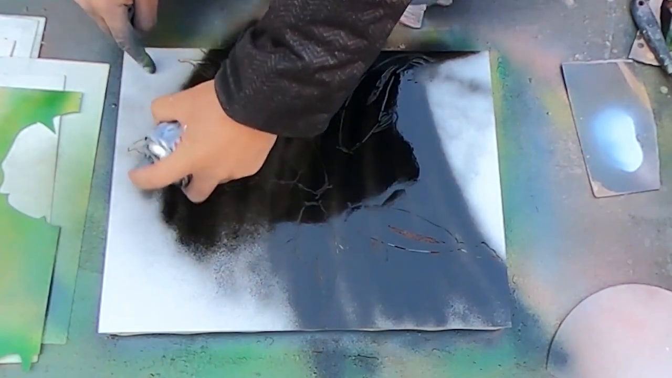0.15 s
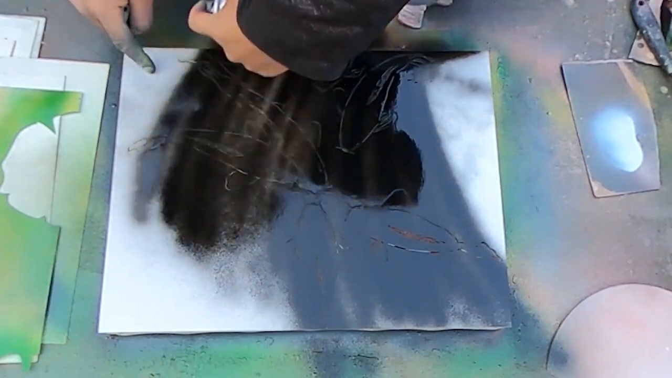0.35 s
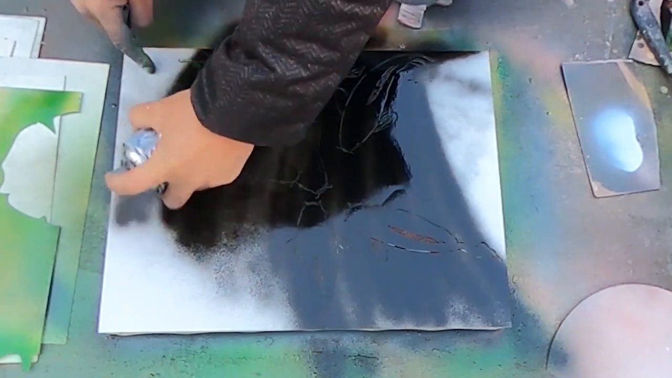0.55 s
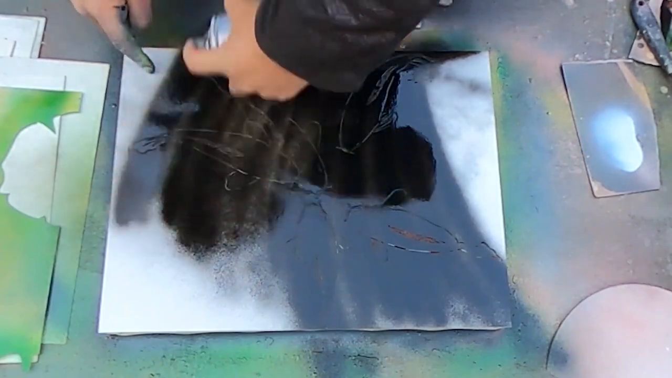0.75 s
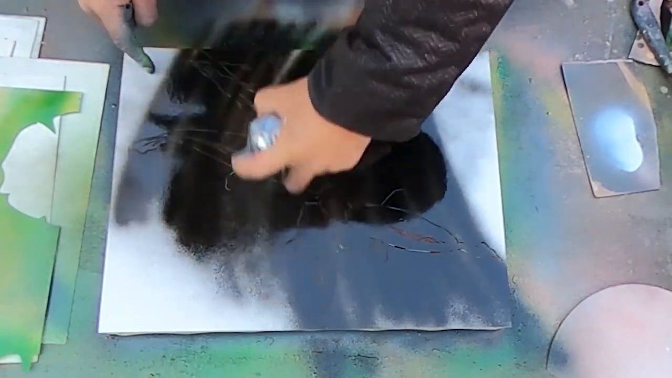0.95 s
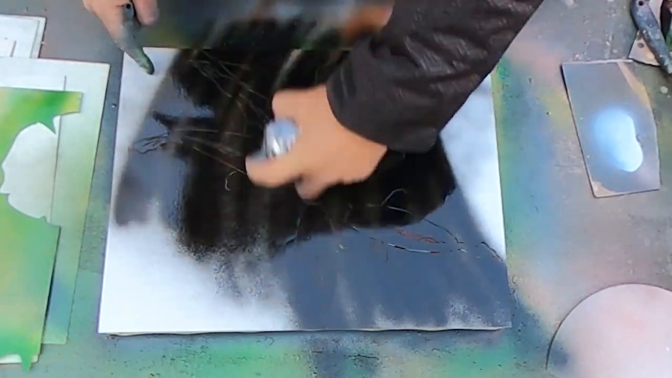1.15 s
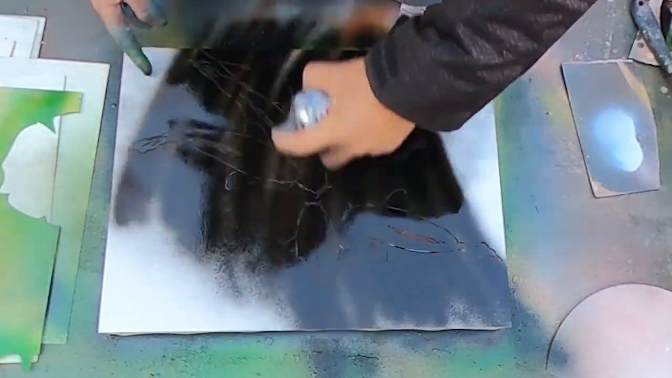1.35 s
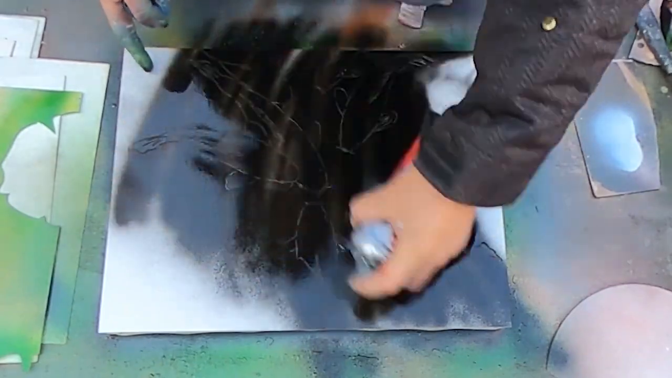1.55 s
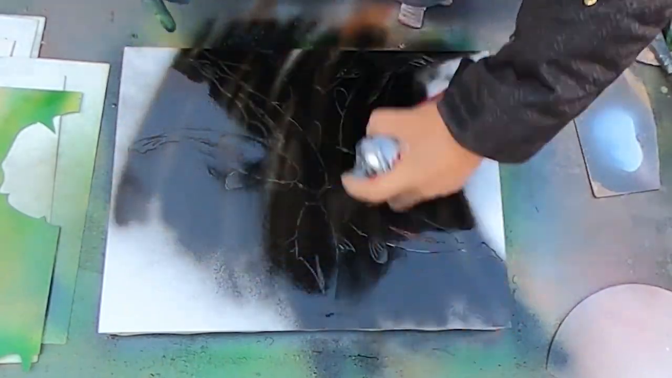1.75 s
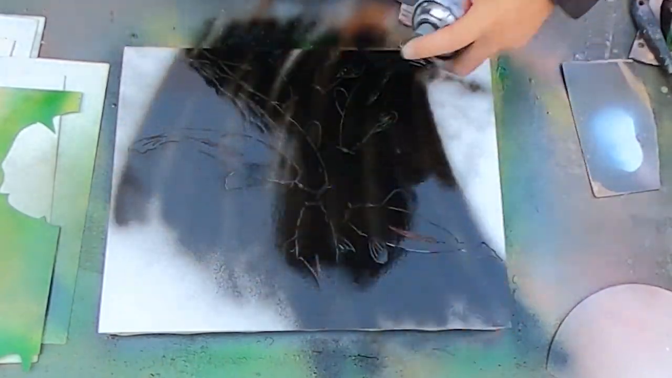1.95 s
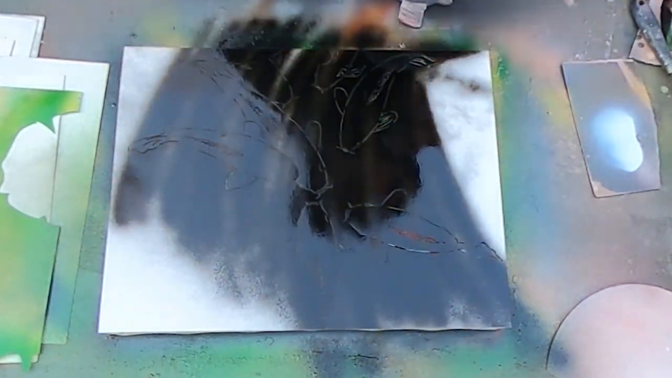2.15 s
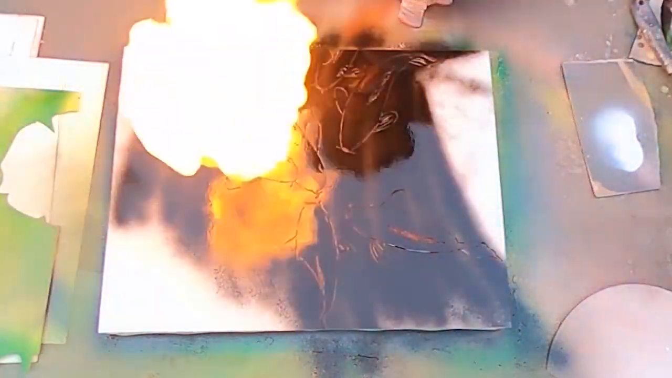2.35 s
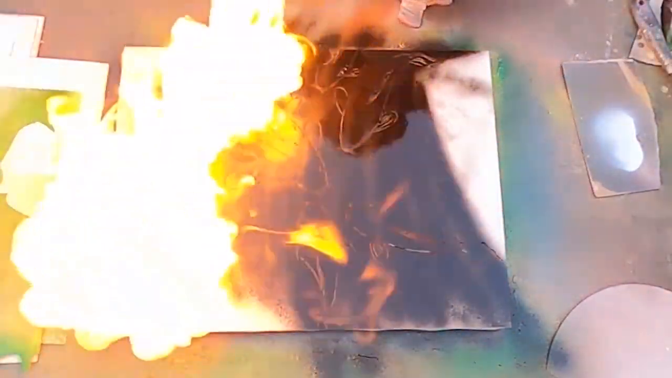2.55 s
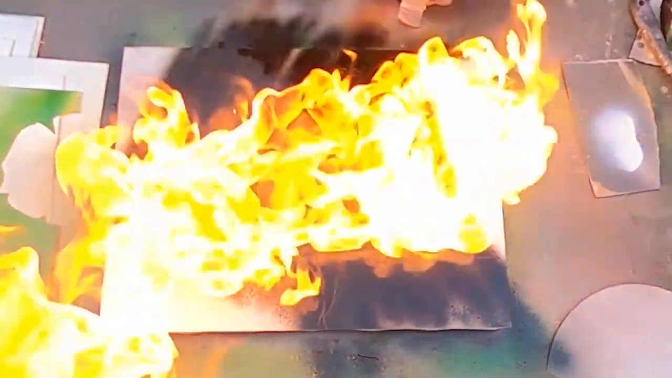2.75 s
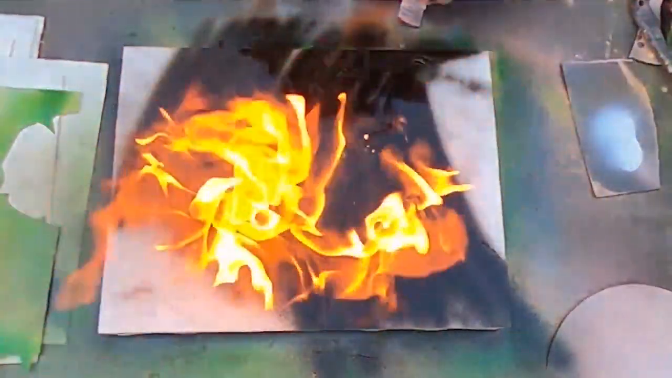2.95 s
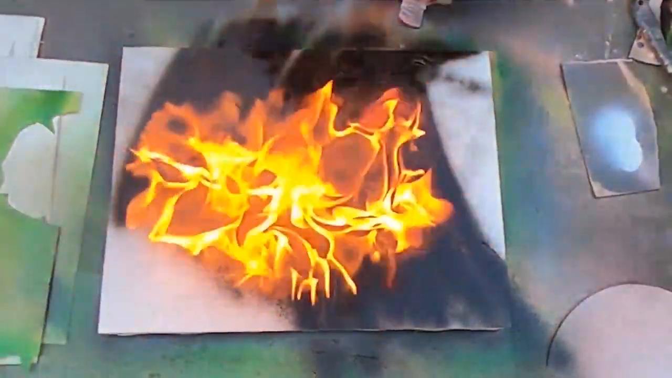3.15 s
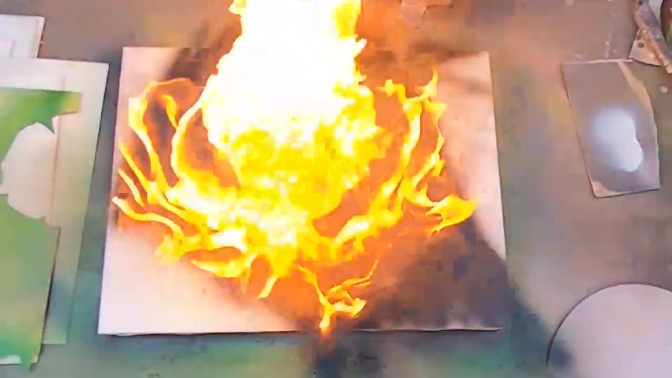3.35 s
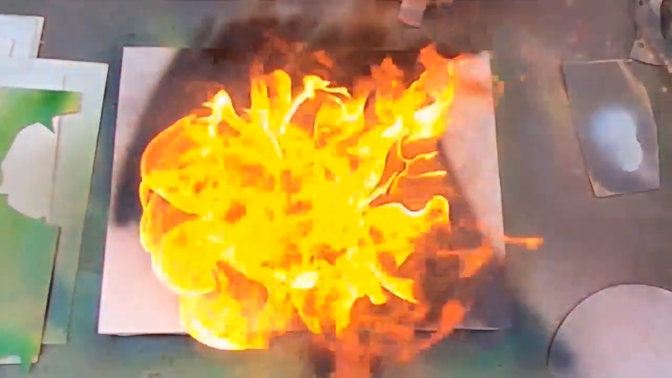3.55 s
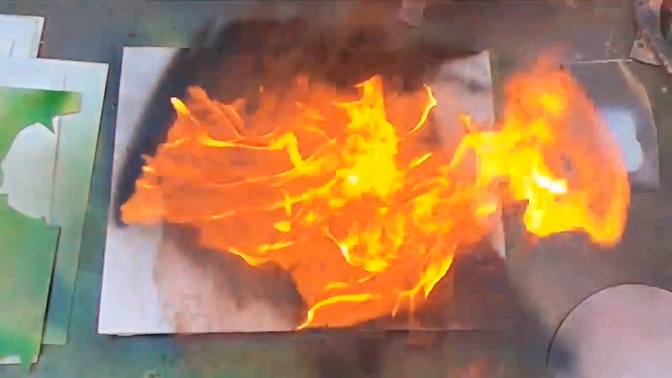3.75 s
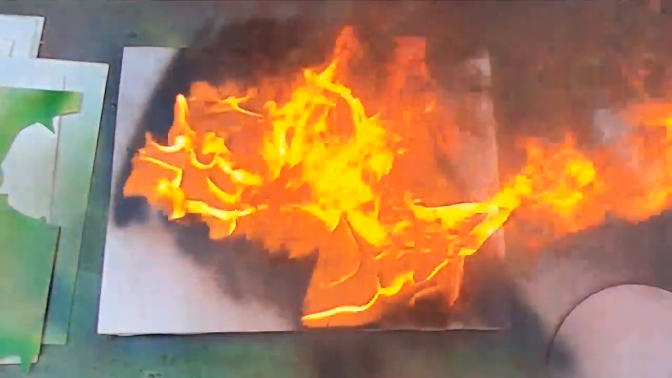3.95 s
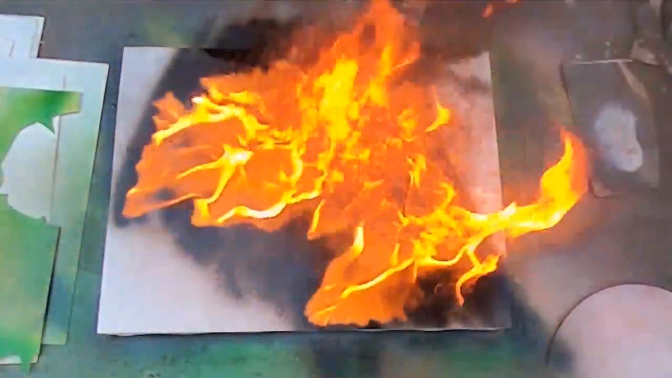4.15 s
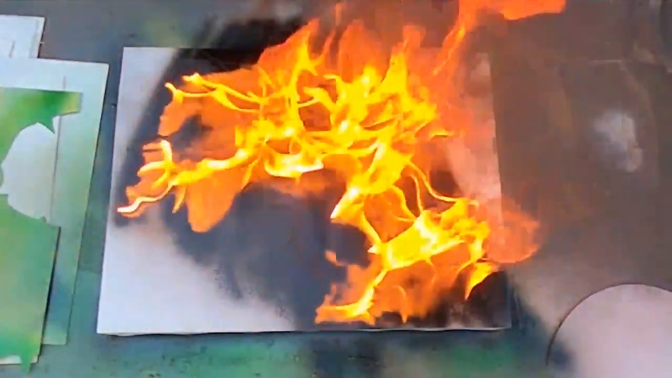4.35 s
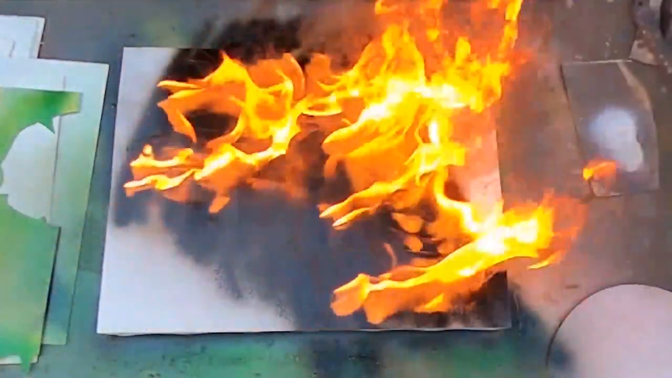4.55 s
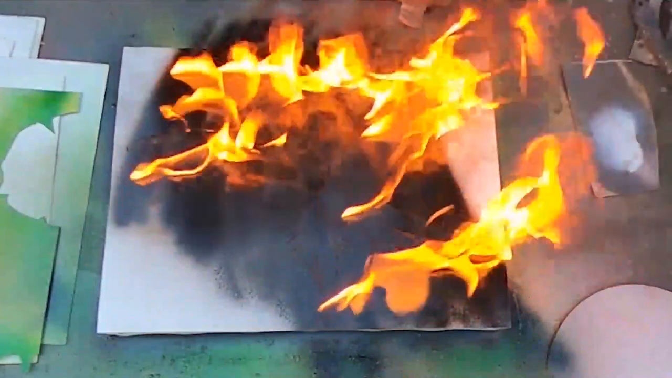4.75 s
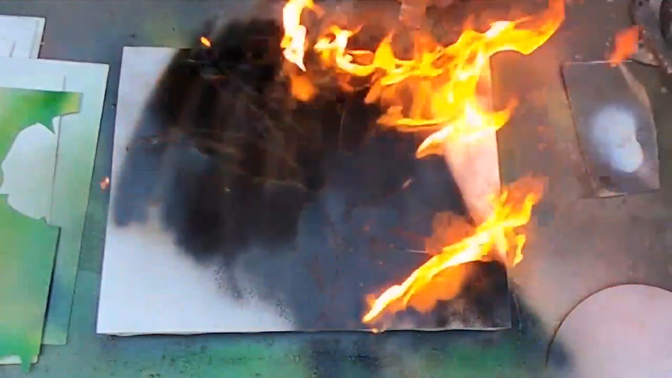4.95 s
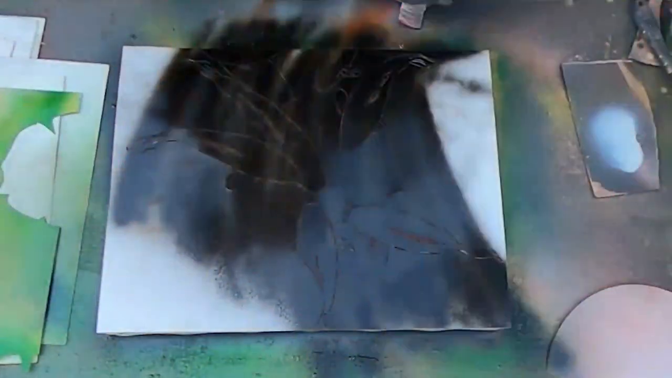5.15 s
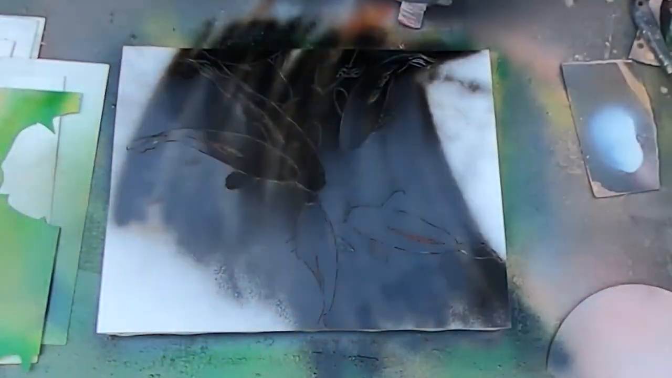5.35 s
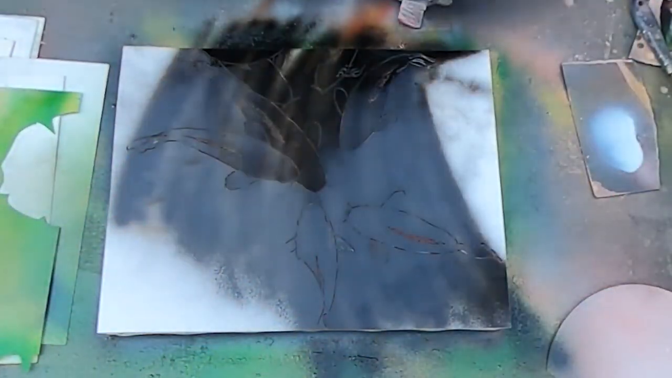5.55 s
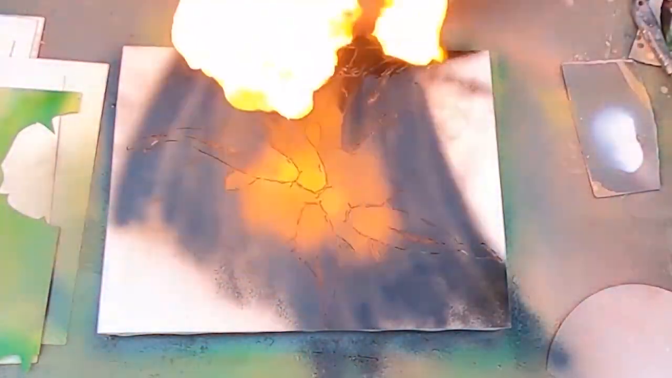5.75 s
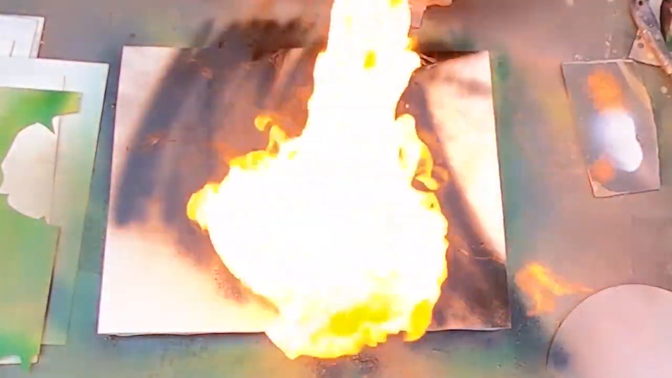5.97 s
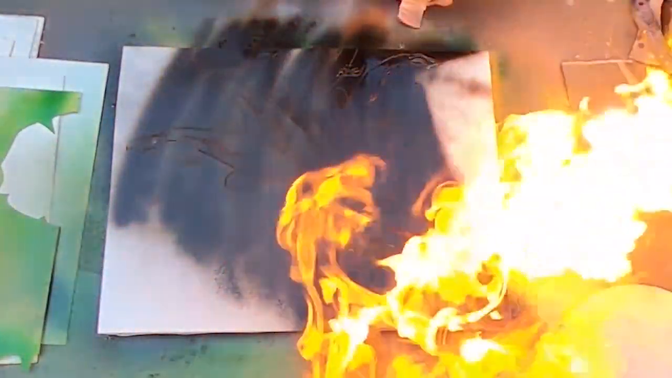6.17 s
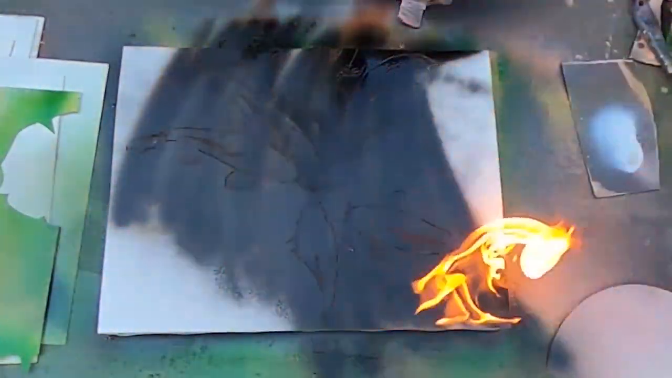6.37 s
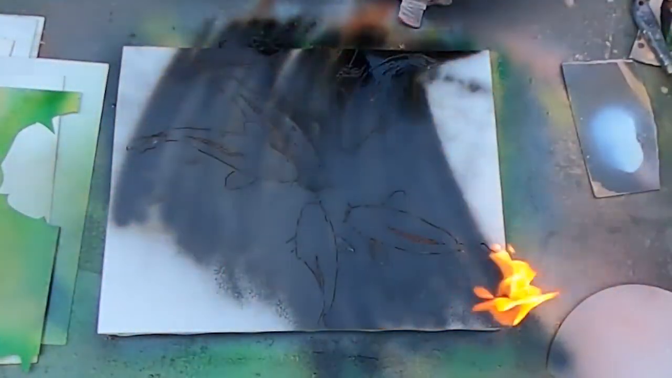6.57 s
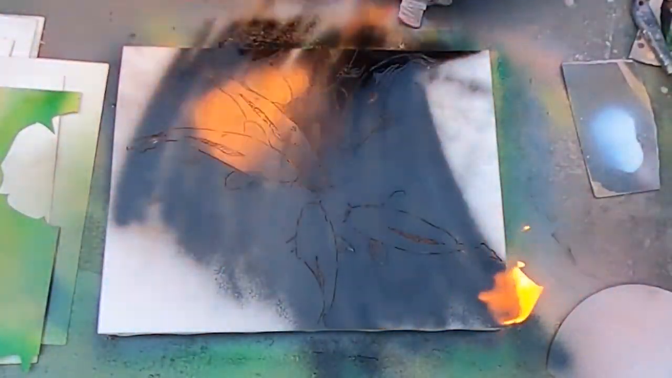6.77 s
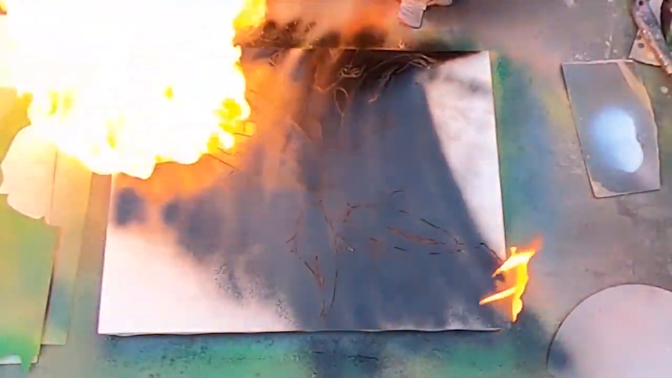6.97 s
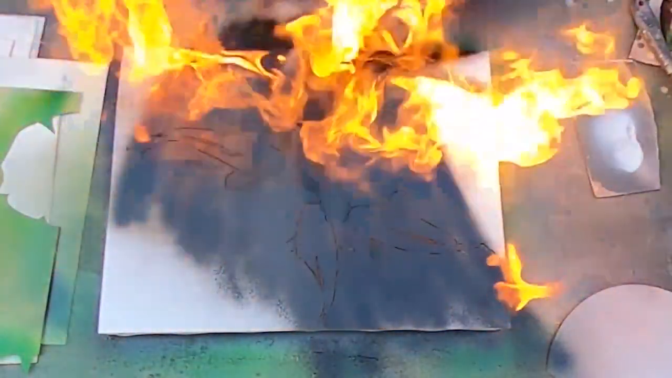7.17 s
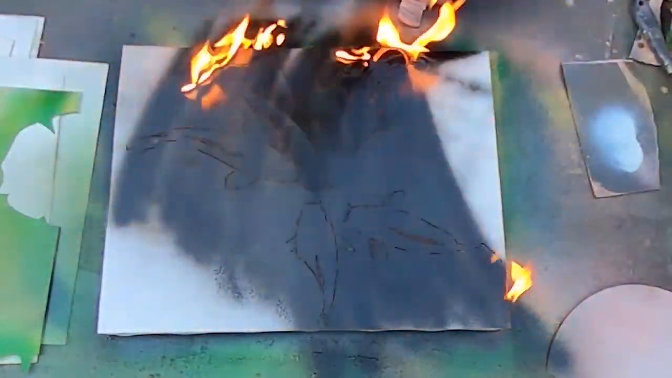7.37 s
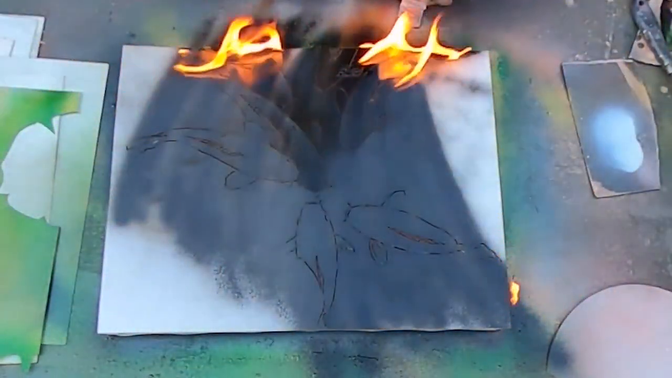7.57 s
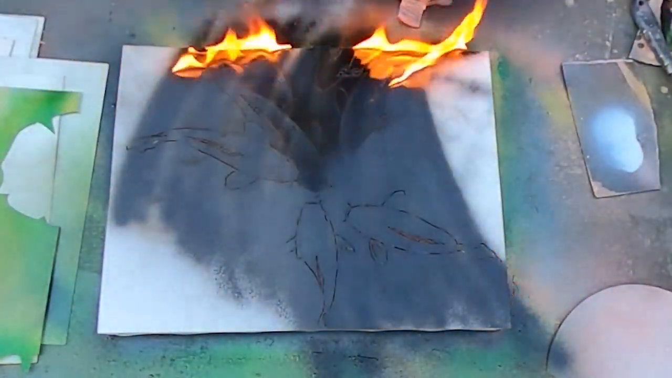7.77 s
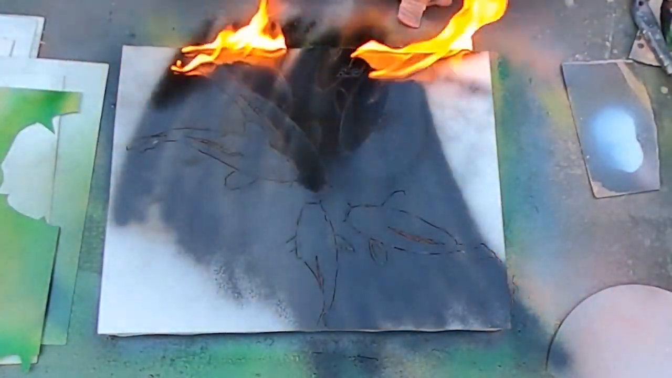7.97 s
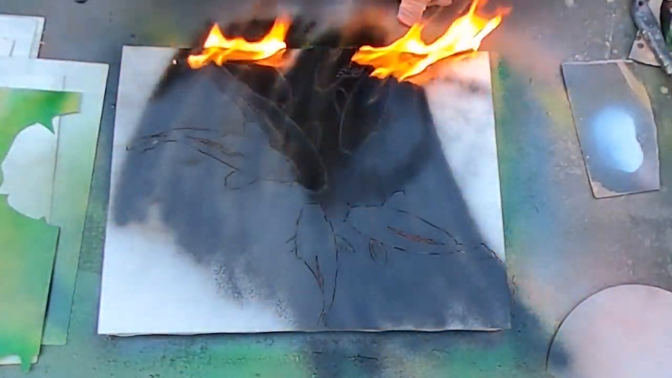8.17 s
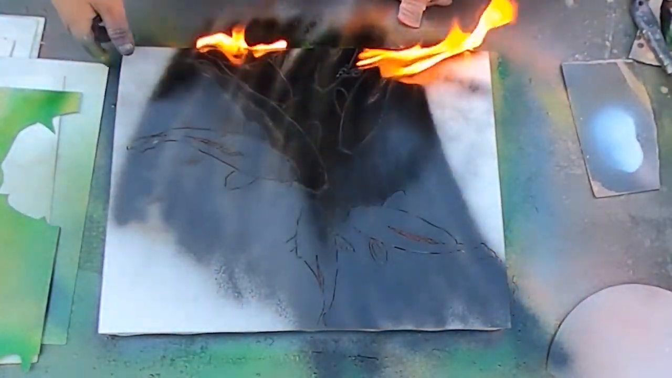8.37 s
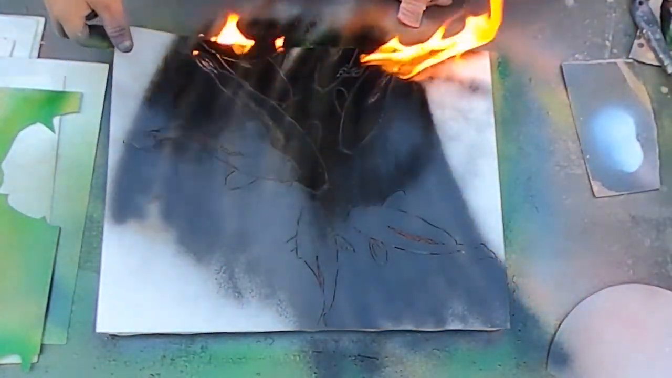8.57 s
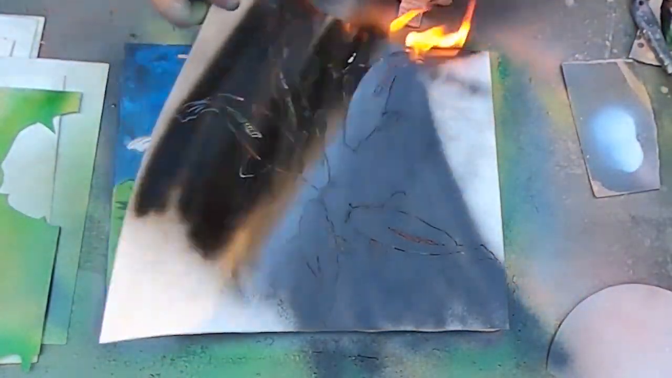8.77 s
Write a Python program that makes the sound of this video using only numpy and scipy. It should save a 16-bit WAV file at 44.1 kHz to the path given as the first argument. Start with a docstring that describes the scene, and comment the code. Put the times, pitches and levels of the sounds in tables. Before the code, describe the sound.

Close up in an outdoor work area, a spray can rattles rapidly, its mixing ball clicking against the metal while the nozzle hisses lightly. After two seconds a jet ignites with a thump and a hissing roar. More flame bursts of differing length follow, separated by quieter gaps and occasional rattles. Finally a can knocks down hard, rings briefly and is stifled. A low wavering hum runs beneath.

```python
"""In a yard with a low, wavering hum, a spray can is shaken over a board: its mixing ball rattles on the wall.
The ball is built from short bursts of wall tones, and the hissing nozzle from coloured noise.
Jets of spray are lit and roar in bursts, made of low roar, a middle rush and a bright hiss, with pressure thuds.
A can is set down, rings and is quickly silenced: table and can tones, with scraping noise."""
import sys
import numpy as np
from scipy import signal
from scipy.io import wavfile
from scipy.ndimage import uniform_filter1d, map_coordinates

SR = 44100
rng = np.random.default_rng(int(sys.argv[2]) if len(sys.argv) > 2 else 0)


def attenuation_scalar(level_db):
    """Turn a level in dB into a linear amplitude multiplier (20 dB per decade)."""
    decades = np.asarray(level_db, float) / 20
    return 10 ** decades


def wav_out(sig):
    """Save sig, one row per channel (or a flat mono array), as 16-bit PCM at SR to the path in sys.argv[1]."""
    wavfile.write(sys.argv[1], SR, np.round(np.clip(np.atleast_2d(sig).T, -1, 1) * 32767).astype(np.int16))


N = 388962  # length in samples


def unit(x):
    """Bring to rms 1."""
    return x / np.sqrt(np.mean(x ** 2) + 1e-20)


def along(points, hz):
    """Read (pitch_hz, value) points on a log pitch axis."""
    f, v = np.transpose(points)
    return np.interp(np.log(hz + 1), np.log(f + 1), v)


def gains(rows):
    """Turn each level_db column into a gain per sample, fading out beyond the table's times."""
    t = np.arange(N) / SR
    s, *columns = np.transpose(rows)
    fade = np.clip(np.minimum(t - s[0], s[-1] - t) / 0.01 + 1, 0, 1)
    return fade * attenuation_scalar([np.interp(t, s, column) for column in columns])


def gate(start, end, rise, fall):
    """0 to 1 and back: columns of times give rows of smooth switches, each ramp centred on its time."""
    t = np.arange(N) / SR
    return np.clip(np.minimum((t - start) / rise, (end - t) / fall) + 0.5, 0, 1) ** 2


def wobble(rate):
    """A smooth random curve through rate random points a second."""
    return map_coordinates(rng.standard_normal(int(N * rate / SR) + 4), [np.arange(N) * rate / SR])


def noise(spectrum, patchy_db, lumpy_db, rate):
    """Coloured noise of rms 1, uneven over time and pitch (patchy) and in overall level (lumpy)."""
    hz, _, z = signal.stft(rng.standard_normal(N + 4096), SR, nperseg=2048)
    field = uniform_filter1d(rng.standard_normal(z.shape), size=16, axis=0)
    field = uniform_filter1d(field, size=2, axis=1)
    colour_db = along(spectrum, hz)[:, None] + patchy_db * unit(field)
    x = signal.istft(z * attenuation_scalar(colour_db), SR, nperseg=2048)[1]
    return unit(x[:N] * attenuation_scalar(lumpy_db * wobble(rate)))


def rings(modes, count, seconds, scatter_db, detune, attack, soft_db=0):
    """Fading tones of peak 1 per blow, each mode varied in strength, pitch and phase; soft blows are duller."""
    hz, db, t60 = np.transpose(modes)[:, None, :, None]
    db = db - np.reshape(soft_db, (-1, 1, 1)) * np.log2(np.maximum(hz / 1000, 1))
    draw = rng.standard_normal((count, len(modes), 3))
    t = np.arange(int(seconds * SR)) / SR
    phase = 2 * np.pi * hz * (1 + detune * draw[..., 1:2]) * t + 2 * draw[..., 2:]
    x = np.sum(attenuation_scalar(db + scatter_db * draw[..., :1] - 60 * t / t60) * np.sin(phase), axis=1)
    x = x * (1 - np.exp(-t / attack))
    return x / np.max(np.abs(x), axis=1, keepdims=True)


def place(times, sounds):
    """Sum the rows of sounds at their start times."""
    at = np.round(np.asarray(times) * SR).astype(int)[:, None] + np.arange(sounds.shape[1])
    return np.bincount(at.ravel(), sounds.ravel(), N + SR)[:N]


# rumble and hum around the scene: time_s, rumble_db, hum_db
AMBIENT = [(0, -48.5, -42.5), (2, -48, -42), (2.4, -43.5, -38), (3.8, -46, -46.5), (5, -41, -38),
           (6.5, -47, -44), (7.7, -42, -42.5), (8.82, -44.5, -44.5)]
# colour of the rumble: pitch_hz, relative level_db
RUMBLE_COLOUR = [(12, -57.5), (24, -8), (54, -5.5), (140, -7.5), (300, -19.5), (445, -32.5), (3000, -51.5),
                 (6600, -110)]


def surroundings():
    """Far rumble is low noise; the machine hum is one tone wavering in pitch and strength."""
    rumble, hum = gains(AMBIENT)
    pitch_hz = 178 + 5.1 * wobble(12)
    phase = 2 * np.pi * np.cumsum(pitch_hz) / SR
    tone = unit((1 + 0.3 * wobble(17)) * np.sin(phase))
    return rumble * noise(RUMBLE_COLOUR, patchy_db=0.5, lumpy_db=2.5, rate=9.8) + hum * tone


# how long the yard's echo takes to fall by 60 dB: pitch_hz, decay_s
YARD_DECAY = [(300, 0.42), (3000, 0.13), (12000, 0.27)]


def yard(x):
    """Nearby surfaces answer after a short delay, each frequency dying at its own speed."""
    hz, t, z = signal.stft(rng.standard_normal(SR // 3), SR, nperseg=128)
    decay = attenuation_scalar(-60 * t / along(YARD_DECAY, hz)[:, None])
    tail = signal.istft(z * decay, SR, nperseg=128)[1]
    delayed = np.pad(x, (120, 0))  # samples
    return signal.fftconvolve(delayed, tail / np.linalg.norm(tail))[:N]


# brief narrow-band noises, some hollow and one hissing: start_s, end_s, pitch_hz, width_hz, level_db
NARROW_NOISES = [(4.01, 4.09, 2130, 895, -58), (5.044, 5.202, 3200, 500, -37.5),
                 (5.62, 5.671, 2400, 805, -48)]


def narrow_noises():
    """Brief noises, each filtered to its own pitch and width and faded in and out."""
    total = np.zeros(N)
    for start, end, hz, width, db in NARROW_NOISES:
        count = int((end - start) * SR)
        band = signal.butter(2, [hz - width / 2, hz + width / 2], "band", fs=SR, output="sos")
        burst = unit(signal.sosfilt(band, rng.standard_normal(count)))
        burst = burst * signal.windows.tukey(count, 0.5)
        total += place([start], attenuation_scalar(db) * burst[None])
    return total


# stretches of unlit hiss: starts_s, ends_s, hiss_db
SPRAYS = [(-.05, 0.31, -51), (0.453, 0.65, -49.5), (0.675, 1.37, -49.5), (1.607, 1.724, -41.5),
          (1.827, 1.96, -44), (5.687, 5.842, -49)]
# quiet fizz behind everything: time_s, level_db
FIZZ = [(0, -52.5), (1.98, -64), (2.04, -57.5), (3.15, -60.5), (3.6, -64), (4.6, -62.5), (4.98, -55),
        (5.35, -63), (6.4, -56.5), (6.5, -63.5), (7.45, -58.5), (7.6, -68.5), (8.82, -66.5)]
# colour of the unlit hiss: pitch_hz, relative level_db
SPRAY_COLOUR = [(300, -58), (500, -9), (1870, -2), (3980, -6), (7100, 0), (8700, -16.5), (12300, -27),
                (16000, -45)]


def spray():
    """The nozzle hisses: coloured noise that comes and goes in stretches over a quiet fizz."""
    starts, ends, db = np.transpose(SPRAYS)[:, :, None]
    stretches = np.sum(attenuation_scalar(db) * gate(starts, ends, rise=0.085, fall=0.03), axis=0)
    flow = gains(FIZZ)[0] + stretches * attenuation_scalar(1.0 * wobble(7.2))
    return flow * noise(SPRAY_COLOUR, patchy_db=1.3, lumpy_db=1.5, rate=110)


# the can scrapes and rocks after landing: start_s, end_s, starting level_db, fading_db_per_s
SCRAPES = [(8.009, 8.166, -22, 65), (8.17, 8.214, -41, 64), (8.218, 8.331, -30.5, 34),
           (8.3, 8.907, -52, -1)]
# colour of the scraping: pitch_hz, relative level_db
RUB_COLOUR = [(35, -16), (60, 9), (390, -16.5), (670, -7.5), (2300, -17.5), (7400, -25), (12000, -55),
              (16000, -81)]


def scrape():
    """The can scrapes as it rocks: rough, patchy noise that changes in level during each stroke."""
    edge_s = 0.011
    start, end, db, fading = np.transpose(SCRAPES)[:, :, None]
    since = np.clip(np.arange(N) / SR - start, 0, 1)
    drag = np.sum(attenuation_scalar(db - fading * since) * gate(start, end, edge_s, edge_s), axis=0)
    return drag * noise(RUB_COLOUR, patchy_db=3.0, lumpy_db=4.5, rate=110)


# can landings: time_s, thud peak_db, ring peak_db before roughening, softness_db_per_octave above 1 kHz
LANDINGS = [(8.018, -7.5, -15, -8), (8.035, -10.5, -34, 8.5), (8.053, -4.5, -17.5, 10.5),
            (8.07, -13, -36, -3), (8.092, -20, -29, 6), (8.118, -25, -20.5, -1), (8.1538, 3, -56, -1.5),
            (8.188, -13, -60, 7.5), (8.225, -15, -58, 14), (8.247, -13.5, -62, 13)]
# tones under the blow, mostly of the table, plus two long low tones of the can that ring on after the stop:
# pitch_hz, relative level_db, time to fall 60 dB decay_s
TABLE = [(149, 1, 0.04), (204, -2, 0.061), (395, -3.5, 0.026), (660, -4, 0.04), (780, -32, 0.99),
         (1060, 6.5, 0.013), (1160, -34, 0.94), (1250, 8, 0.0076), (1720, 5.5, .007), (2290, 10, 0.0042),
         (2780, 1.5, 0.011), (3940, -9, 0.013), (6930, -14, 0.0074)]
# free tones of the can: pitch_hz, relative level_db, time to fall 60 dB decay_s
CAN = [(662, -10, .17), (1066, -2, .15), (1222, -2, .6), (1726, -6, .4), (2182, -9, .2), (2519, -5, .3),
       (2781, -2, .5), (3212, -6, .35), (3752, -5, .15), (4172, -14, .18), (4360, -9, .11), (5055, -14, .2),
       (5324, -14, .15), (6401, -15, .15)]


def landing():
    """Table and can ring in their own tones; the can's bright ring is soon stopped, while the table's tones and
    two low can tones die by themselves."""
    ring_stop_s = 8.152  # a hand or the table stops the can's ring
    boom_s, boom_db = 8.026, -13.5
    s, peak_db, ring_db, soft_db = np.transpose(LANDINGS)
    thud = rings(TABLE, len(s), seconds=0.29, scatter_db=0.5, detune=0.0112, attack=0.00057, soft_db=soft_db)
    thud = place(s, attenuation_scalar(peak_db)[:, None] * thud)
    ring = rings(CAN, len(s), seconds=0.2, scatter_db=2.5, detune=0.004, attack=0.006)
    ring = place(s, attenuation_scalar(ring_db)[:, None] * ring)
    ring = ring * attenuation_scalar(2.5 * wobble(130))  # rocking on the table roughens it
    stop = attenuation_scalar(-60 * np.clip(np.arange(N) / SR - ring_stop_s, 0, None) / 0.01)
    # the table top booms under the first landing in one low tone (Hz, dB, decay s)
    boom = rings([(122, 0, 0.086)], 1, seconds=0.15, scatter_db=0, detune=0, attack=0.0037)
    return thud + stop * ring + place([boom_s], attenuation_scalar(boom_db) * boom)


# jets for the flames: valve_opens_s, pressure_shifts_s, valve_shuts_s, first hiss_db, later hiss_db
JETS = [(2.415, 2.666, 2.918, -32, -39.5), (3.388, 3.565, 3.56, -40, -46), (4.989, 5.17, 5.29, -39.5, -43),
        (5.821, 6.084, 6.345, -30.5, -42), (6.814, 7.183, 7.275, -38, -33)]


def jet_flow():
    """Strength of the nozzle jets: the valve opens and shuts, and the pressure shifts in between."""
    valve_s, shift_s = 0.046, 0.039
    t = np.arange(N) / SR
    opens, shift, shuts, first_db, later_db = np.transpose(JETS)[:, :, None]
    shifted = (1 + np.tanh((t - shift) / shift_s)) / 2
    pressed_db = first_db + (later_db - first_db) * shifted
    return np.sum(attenuation_scalar(pressed_db) * gate(opens, shuts, valve_s, valve_s), axis=0)


# colour of the jet's hiss: pitch_hz, relative level_db
JET_COLOUR = [(1470, -3.5), (2500, -4.5), (6860, -3), (7830, -4), (8660, -19), (12600, -26), (16000, -36)]


def jet_hiss(jet):
    """The nozzle jet hisses: bright noise that follows the jet's strength."""
    return jet * noise(JET_COLOUR, patchy_db=0.8, lumpy_db=0.8, rate=90)


# gas lighting up or a flame collapsing: centre_s, peak_db, half_length_s (negative for a suck)
THUDS = [(2.438, -10, 0.0022), (2.888, -15, 0.0012), (3.418, -8, 0.004), (3.545, -13.5, 0.0065),
         (3.632, -12, -0.0031), (5.094, -12.5, .0013), (5.851, -7, .0015), (6.348, -10.5, 0.0036),
         (6.882, -12, 0.006), (7.486, -14.5, -0.006), (8.47, -30, -0.0032)]


def thuds():
    """Sudden burning or collapse pushes the air: one swing of pressure, up then down, or reversed."""
    half = 2000  # samples on each side of the centre
    s, peak_db, width = np.transpose(THUDS)[:, :, None]
    u = (np.arange(2 * half) - half) / SR / width
    whump = -attenuation_scalar(peak_db) * u * np.exp((1 - u ** 2) / 2)
    return place(s[:, 0] - half / SR, whump)


# the fire on the board flares up by itself: peak_s, roar_db, growing_s, sinking_s
FLARES = [(3.265, -23, 0.015, 0.073), (3.349, -11.5, 0.034, 0.025), (3.61, -25.5, 0.064, 0.038),
          (5.19, -13.5, 0.031, 0.041), (6.379, -29.5, 0.018, 0.036)]
# colour of the flaring: pitch_hz, relative level_db
BILLOW_COLOUR = [(15, -29), (35, 4), (70, 0.5), (170, -7.5), (400, -33.5), (650, -74)]


def flares():
    """Fire on the board billows: low noise that grows to a peak and sinks again."""
    t = np.arange(N) / SR
    peak, db, grow, sink = np.transpose(FLARES)[:, :, None]
    level = attenuation_scalar(db) * np.exp(-np.abs(t - peak) / np.where(t < peak, grow, sink))
    return level.sum(axis=0) * noise(BILLOW_COLOUR, patchy_db=2.0, lumpy_db=-1.0, rate=30)


# burning gas: lights_s, swell_peak_s, dies_s, steady roar_db, swell_db over the roar
FLAMES = [(2.427, 2.861, 2.895, -22, 0), (3.406, 3.545, 3.563, -28.5, 6), (5.076, 5.185, 5.215, -31, 11),
          (5.848, 6.264, 6.352, -22, 8.5), (6.875, 7.25, 7.292, -20.5, 7)]
# colours of the steady roar, its swell and the middle rush: pitch_hz, relative level_db
ROAR_COLOUR = [(15, -27), (25, -6), (50, 9), (115, 0.5), (240, 0), (320, -19), (600, -100)]
SWELL_COLOUR = [(30, -12), (100, 0), (260, -3), (340, -12), (720, -21.5), (850, -32), (1500, -75)]
RUSH_COLOUR = [(120, -15.5), (280, -3.5), (420, -10.5), (700, -11.5), (1050, -14.5), (3500, -27),
               (6000, -99)]


def flames(jet):
    """Burning eddies thump in low noise; where jet and flame mix, they rush in the middle range."""
    catch_s = 0.012  # catching fire or choking off
    flash_db, flash_s = 4.5, 0.055  # the gathered cloud burns off first
    build_s, ebb_s = 0.035, 0.046  # growth and collapse of the swell
    die_db, die_s = -10.5, 0.083  # after the sudden drop the rest burns out
    rush_db, rush_flash_db, roar_share = -1, 6, 0.44  # over the blend of roar and jet; extra in the flash
    t = np.arange(N) / SR
    lit, top, out, db, swell_db = np.transpose(FLAMES)[:, :, None]
    flash = np.exp(-np.abs(t - lit) / flash_s)
    burning = attenuation_scalar(db + flash_db * flash) * gate(lit, out, catch_s, catch_s)
    swell = np.exp(-np.abs(t - top) / np.where(t < top, build_s, ebb_s))
    surge = np.sum(burning * attenuation_scalar(swell_db) * swell, axis=0)
    # a weaker fire runs under each flame and outlasts it
    embers = attenuation_scalar(db + die_db) * np.exp(-np.clip(t - out, 0, 9) / die_s) * (t > lit)
    roar = np.sum(burning + embers, axis=0)
    blend = (roar + surge) ** roar_share * jet ** (1 - roar_share)
    rush = attenuation_scalar(rush_db + rush_flash_db * flash.sum(axis=0)) * blend
    low = roar * noise(ROAR_COLOUR, patchy_db=1.5, lumpy_db=2.7, rate=30)
    low = low + surge * noise(SWELL_COLOUR, patchy_db=2.5, lumpy_db=-0.5, rate=48)
    return low + rush * noise(RUSH_COLOUR, patchy_db=2.5, lumpy_db=1.06, rate=58)


def snaps(spectrum, times, peak_db, t60, attack, shift):
    """Each contact wakes a new crowd of quickly damped wall modes under the spectrum."""
    modes = 24
    draw = rng.random((len(times), modes, 2))
    low, high = spectrum[0][0], spectrum[-1][0]
    hz = low + (high - low) * (np.arange(modes)[:, None] + draw[..., :1]) / modes
    spot = np.exp(shift * rng.standard_normal((len(times), 1, 1)))  # where the wall is struck moves the colour
    t = np.arange(int(t60 * SR)) / SR
    x = np.sum(attenuation_scalar(along(spectrum, hz * spot)) * np.sin(2 * np.pi * (hz * t + draw[..., 1:])), axis=1)
    x = x * attenuation_scalar(-60 * t / t60) * (1 - np.exp(-t / attack)) ** 2
    return place(times, attenuation_scalar(peak_db)[:, None] * x / np.max(np.abs(x), axis=1, keepdims=True))


# bright and dull tones of the paint-damped can wall: pitch_hz, relative level_db
WALL_HIGH = [(2400, -18.5), (3500, -14.5), (4700, 1), (5800, 4.5), (7400, 0.5), (8600, -18.5),
             (11000, -28.5), (15500, -44)]
WALL_LOW = [(600, -28.5), (1100, -8.5), (1800, 1), (2280, 4), (2900, -4.5), (4500, -9)]


def ball(times, tick_db, knock_db):
    """Each contact ticks in the bright modes, knocks in the dull ones and leaves one hollow note."""
    swap_s, full_db, empty_db = 2.35, -26, -15  # the second can is emptier and sings more: note under the knock
    # the hollow note (Hz, dB, decay s)
    note = rings([(2230, 0, 0.05)], len(times), seconds=0.06, scatter_db=0, detune=0.02, attack=0.0012)
    note_db = knock_db + np.where(times < swap_s, full_db, empty_db)
    hollow = place(times, attenuation_scalar(note_db)[:, None] * note)
    tick = snaps(WALL_HIGH, times, tick_db, t60=0.013, attack=0.00016, shift=0.031)
    knock = snaps(WALL_LOW, times, knock_db, t60=0.014, attack=0.00012, shift=0.14)
    return tick + knock + hollow


# the ball rolls while the can is moved: start_s, end_s, contacts_per_s, middle tick peak_db
ROLLING = [(0, 2, 65, -43), (2.11, 2.38, 35, -40), (3.95, 4.98, 24, -56), (8.2, 8.8, 40, -52)]


def rolling():
    """The ball rolls along the wall in many faint contacts at random times and strengths."""
    spread_db = 28  # from the faintest to the strongest contact
    total = 0
    for start, end, rate, db in ROLLING:
        draw = rng.random((int(rate * (end - start)), 3))
        tick_db, knock_db = db + spread_db * (draw[:, 1:].T - 0.5)
        total = total + ball(start + (end - start) * draw[:, 0], tick_db, knock_db + 5.0)
    return total


# clear ball contacts on the can: time_s, bright tick peak_db, dull knock peak_db
RATTLE = [(0.027, -40, -28), (0.0973, -33, -21), (0.326, -41, -26), (0.379, -37.5, -30), (.778, -24, -44),
          (0.878, -31, -26), (.931, -24, -19.5), (1.2393, -44, -31), (1.5898, -29, -26), (1.725, -38, -25),
          (1.812, -39, -35), (1.846, -29, -32), (0.048, -9, -48), (0.0757, -20, -29.5), (.083, -14.5, -26),
          (0.1016, -17, -58), (0.155, -46, -20.5), (.4272, -19, -47), (.482, -17, -50), (0.609, -24.5, -23),
          (0.666, -30, -28), (0.8322, -29, -16.5), (0.117, -10.5, -24), (0.1285, -15.5, -26),
          (0.1377, -25, -18), (0.2062, -18, -16), (0.2107, -18.5, -17.5), (0.2698, -24, -14.5),
          (0.3485, -5, -29), (.405, -6.5, -33), (.465, -8, -20), (.494, -21.5, -10), (0.517, -39, -19.5),
          (0.7044, -6, -24), (.7306, -9.5, -29), (0.7957, -8.5, -29), (0.8069, -11.5, -24), (.82, -15, -25),
          (.84, -6.5, -19.5), (0.9239, -15.5, -19.5), (.978, -29.5, -19), (1.004, -4.5, -25),
          (1.035, -21, -47), (1.0472, -5, -24), (1.078, -36, -25), (1.117, -15, -25), (1.127, -10, -21),
          (1.139, -22, -36), (1.147, -19, -38), (1.1677, -27, -24), (1.1912, -8.5, -19.5),
          (1.2057, -27, -21.5), (1.224, -34, -20), (1.2919, -15, -16.5), (1.338, -28, -15.5),
          (1.3584, -21, -12.5), (1.3942, -26, -18.5), (1.4063, -3.5, -32), (1.434, -6.5, -26),
          (1.5087, -16, -28), (1.5112, -4.5, -20), (1.532, -17, -21), (1.537, -15, -38), (1.5538, -26, -20),
          (1.572, -35, -24.5), (1.6408, -13.5, -15), (1.667, -21.5, -22), (1.7032, -40, -28),
          (1.7544, -18, -14), (1.7856, -7.5, -18.5), (1.796, -6.5, -34), (1.8658, -14, -28),
          (1.8798, -14, -29), (1.89, -13.5, -34), (1.896, -19, -19), (1.9192, -14, -27),
          (1.932, -14.5, -29), (1.941, -13, -28), (1.963, -13, -20), (1.972, -6, -21), (1.994, -36, -23.5),
          (2.1233, -25, -22.5), (2.144, -16, -19), (2.1728, -26, -22), (2.2639, -26.5, -28),
          (2.307, -18.5, -19), (2.399, -7.5, -19), (3.119, -26.5, -39), (3.212, -28, -33),
          (3.286, -43, -44), (3.305, -33.5, -34.5), (3.337, -46, -35.5), (3.365, -37, -38),
          (3.381, -8.5, -23), (3.981, -38.5, -42), (4.18, -25.5, -32.5), (4.2138, -36, -39.5),
          (4.2284, -25.5, -28), (4.2973, -35, -39), (4.361, -42, -36.5), (4.4492, -24.5, -32),
          (4.84, -42.5, -33.5), (5.018, -6.5, -25.5), (5.024, -11, -30), (5.0613, -21, -24),
          (5.07, -14.5, -22.5), (5.094, -19, -31), (5.1128, -19, -36), (5.139, -14, -27),
          (5.202, -22.5, -28), (5.2195, -23, -31), (5.224, -26, -35), (5.237, -23.5, -33),
          (5.279, -25, -56), (5.2943, -34, -39), (5.307, -32.5, -48), (5.317, -43, -56), (5.5176, -27, -34),
          (5.5805, -34, -37.5), (5.6253, -34, -37), (5.727, -13.5, -17), (5.7418, -12, -15),
          (5.7527, -6.5, -22), (5.7786, -20, -20.5), (6.8413, -8, -16.5), (7.7063, -7, -29),
          (7.76, -8, -22.5), (7.877, -31, -27), (7.8967, -13, -14.5), (7.9182, -11, -13.5),
          (7.932, -22, -27), (7.9624, -31, -23.5), (7.993, -27, -35), (8.286, -33, -40), (8.0194, -8, -42),
          (8.306, -26.5, -31), (8.3807, -36, -35), (8.46, -40, -35), (8.541, -37, -39), (8.555, -33, -33),
          (8.6856, -36, -31)]


def rattle():
    """The ball strikes the wall, then skips twice more, weaker and a few ms later."""
    s, tick_db, knock_db = np.transpose(RATTLE)
    s = s - 0.0008  # the contact starts just before its peak
    x = ball(s, tick_db, knock_db)
    for wait_s in (0.0015, 0.006):
        draw = rng.random((len(s), 2))
        loss_db = -10.5 - 8 * draw[:, 1]
        x += ball(s + wait_s * (0.65 + draw[:, 0]), tick_db + loss_db, knock_db + loss_db)
    return x


def scene():
    """Everything at one microphone; the yard answers the ball, the landing and the scraping."""
    hits = rattle() + landing() + scrape()
    jet = jet_flow()
    fire = flames(jet) + flares() + thuds() + jet_hiss(jet)
    quiet = spray() + rolling() + narrow_noises()
    return (hits + attenuation_scalar(-15.5) * yard(hits) + quiet + fire + surroundings())[None]


def top_cut(x):
    """Nothing passes above the cut-off."""
    return signal.sosfilt(signal.butter(12, 16480, fs=SR, output="sos"), x)


def record(dry):
    """Soft overload: peaks bend smoothly towards a ceiling."""
    top = 0.93
    mix = dry / (1 + np.abs(dry / top) ** 6) ** (1 / 6)
    return top_cut(mix)


dry = scene()
out = record(dry)
wav_out(out)
```